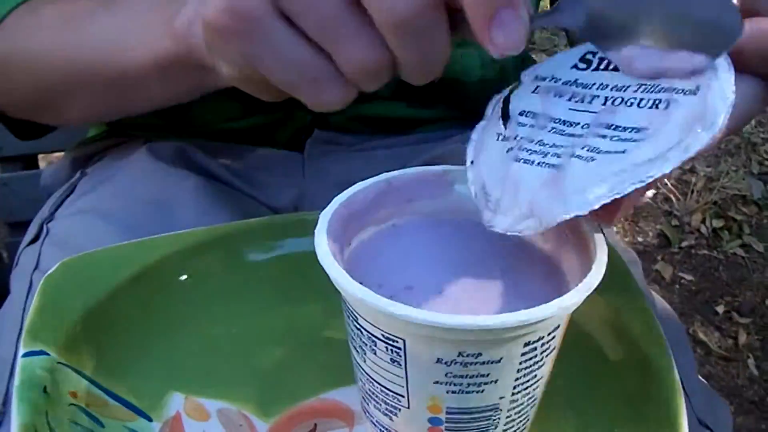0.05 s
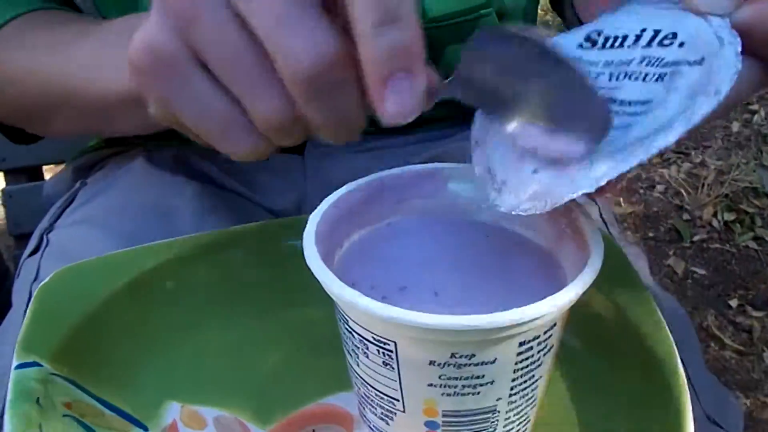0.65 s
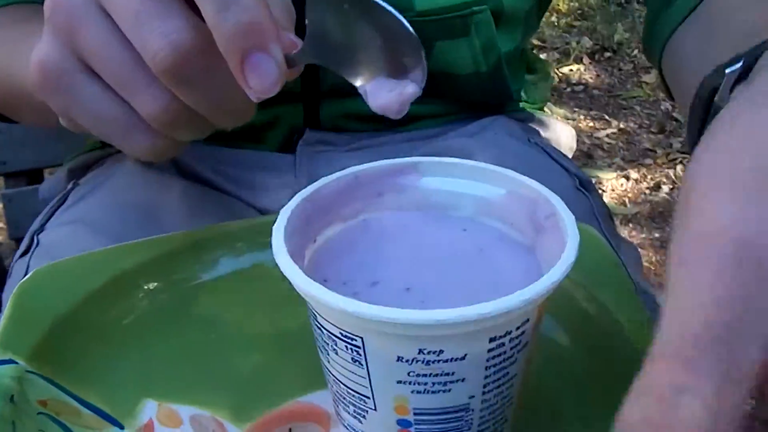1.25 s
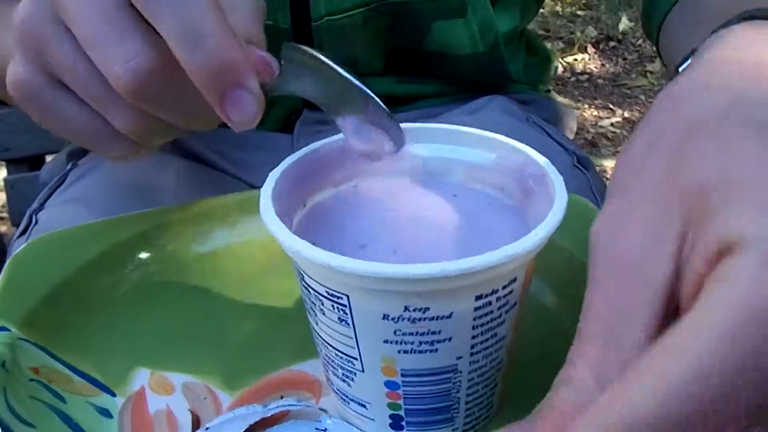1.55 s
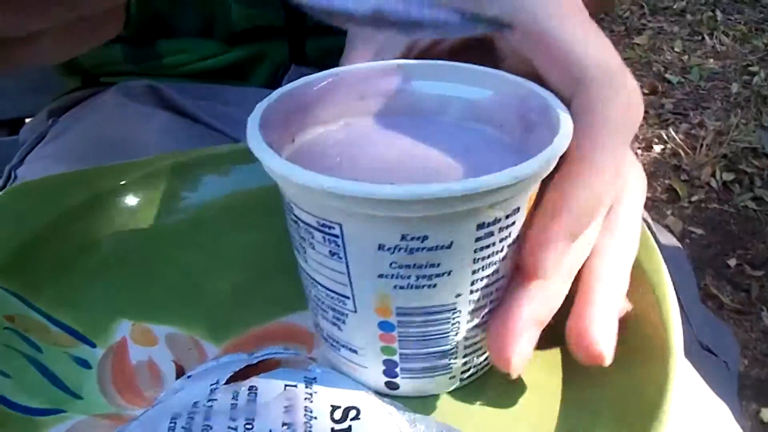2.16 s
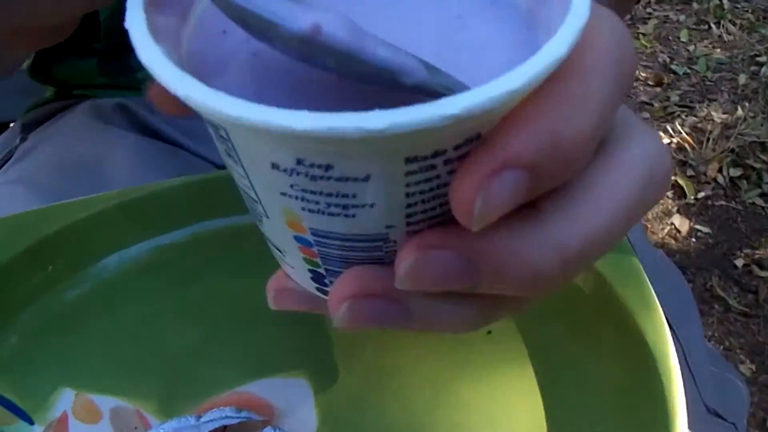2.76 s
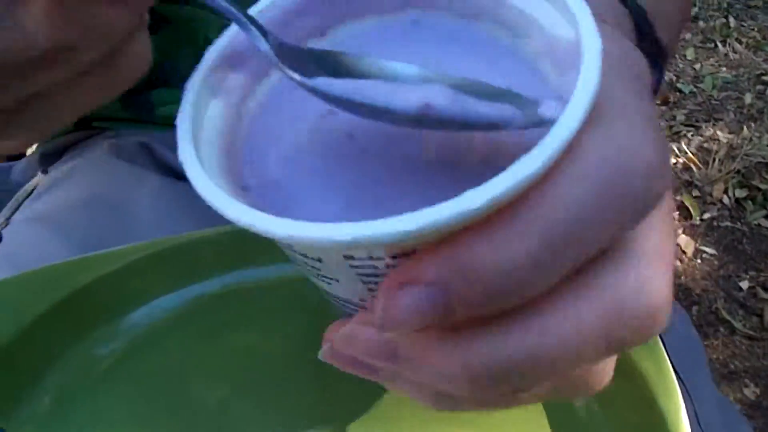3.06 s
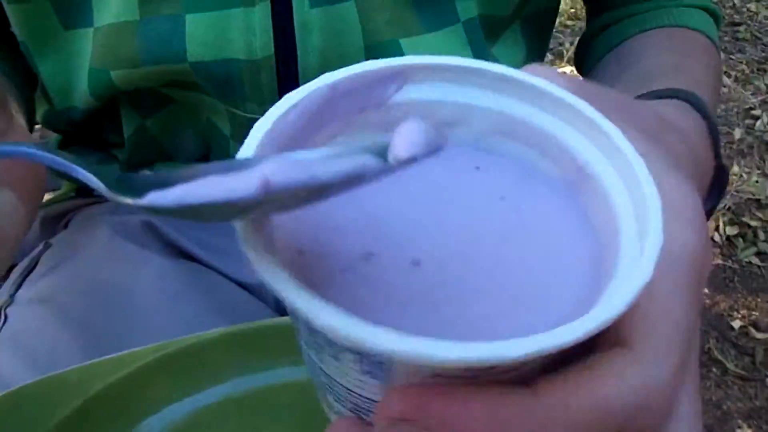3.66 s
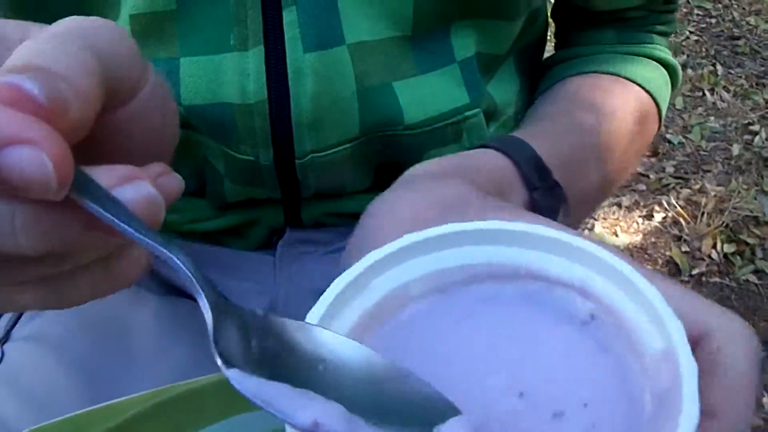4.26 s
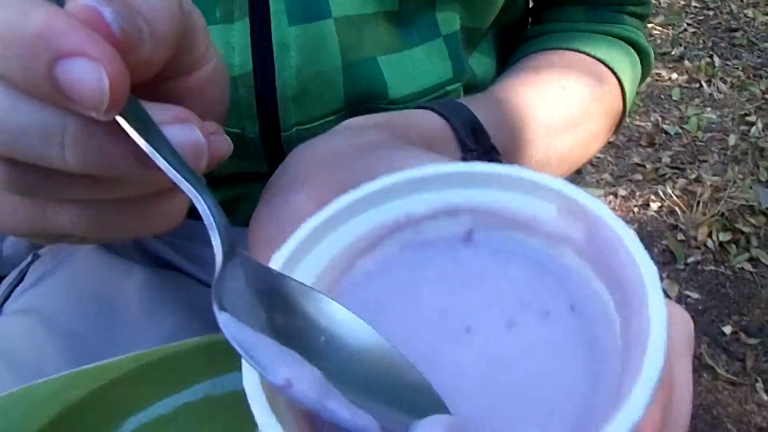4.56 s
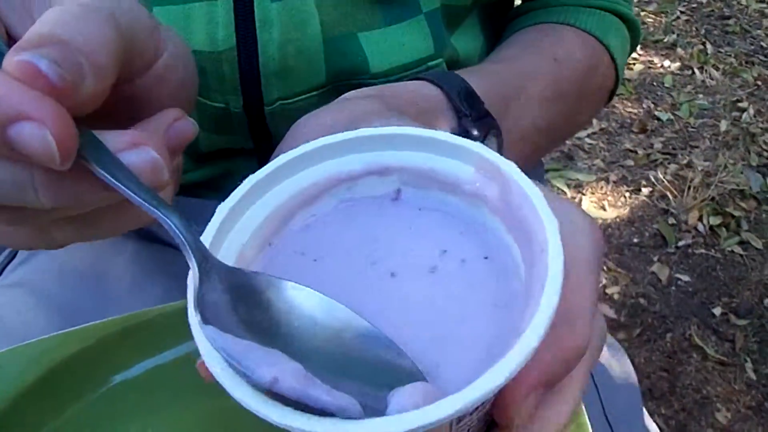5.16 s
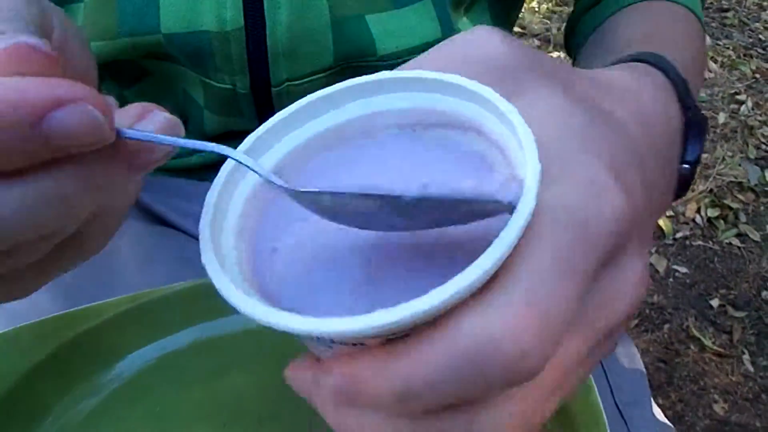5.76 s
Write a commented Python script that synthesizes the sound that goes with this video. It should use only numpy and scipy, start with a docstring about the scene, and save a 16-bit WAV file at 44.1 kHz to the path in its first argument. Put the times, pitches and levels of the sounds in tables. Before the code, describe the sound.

Two close spoon scrapes on foil and a sharp crinkle give way to light plastic cup taps and sleeve swishes over soft outdoor noise.

```python
"""A steel spoon scrapes yogurt off a foil lid in two strokes of stick-slip friction, close by, outdoors.
The lid crinkles as it is put down, its creases buckling one after another. A thin plastic cup gives dry
ticks as it is handled and the spoon taps its rim; fingers slide on its wall and a sleeve swishes.
Behind it all lies outdoor background noise, a soft rush with a low rumble, turned down by the recorder's
automatic gain at the loud crinkle and later swelling gently."""
import sys
import numpy as np
from scipy import signal
from scipy.fft import rfft, irfft, next_fast_len
from scipy.io import wavfile
from scipy.ndimage import map_coordinates

SR = 44100
rng = np.random.default_rng(int(sys.argv[2]) if len(sys.argv) > 2 else 0)


def store_pcm(level_fs):
    """Save levels as 16-bit WAV."""
    pcm = np.round(np.clip(level_fs, -1, 1) * 32767).astype(np.int16)
    wavfile.write(sys.argv[1], SR, np.atleast_2d(pcm).T)


N = 260631
T = np.arange(N) / SR

# Levels in the tables are relative; each source sets its own overall gain.
# outdoor background, with the automatic gain's drop at the crinkle written in: time_s, rush_db, hiss_db
BACKGROUND_LEVELS = [(0, -43, -41.5), (.35, -46.5, -45), (1.2, -47, -45.5), (1.6, -53, -54.5),
                     (3.7, -55, -53), (4.15, -51.5, -52), (4.55, -48.5, -49), (4.85, -51, -52),
                     (5.9, -52, -49)]
# spectra of its three bands: frequency_hz, gain_db
RUMBLE_SPECTRUM = [(12, -8.5), (32, 1), (60, -1), (105, -3), (150, -8.5), (220, -7.5), (350, -21.5),
                   (800, -48)]
RUSH_SPECTRUM = [(120, -8.5), (300, -0.5), (700, -1), (1000, 1), (1400, -3.5), (1900, -5.5), (2200, -3),
                 (2500, -13.5), (5000, -21), (12000, -31)]
HISS_SPECTRUM = [(1000, -13.5), (2600, 3), (4800, 2.5), (6500, 1), (9000, 2), (11500, -1), (14000, -8)]
# rubbing gestures: start_s, length_s, level_db, fastest_at_fraction, brightness_db
SLEEVE_SWISHES = [(2.17, 0.036, -44.5, 0.45, -1), (3.44, 0.15, -41.5, 0.62, 1.5),
                  (3.718, 0.064, -47, 0.54, 5), (3.885, 0.12, -44.5, 0.4, -5), (4.012, 0.15, -43, 0, 1),
                  (4.155, .055, -50, 0.6, 0), (4.32, 0.15, -43.5, 0.22, -1.5), (4.5, 0.15, -44, 0.86, -2)]
FINGER_SLIDES = [(2.235, 0.099, -53, .7, 2), (2.9, 0.06, -46, 0.25, 4), (2.96, 0.03, -42, 0.3, 7),
                 (2.998, .055, -44, .5, 4), (3.04, .3, -44.5, 0.44, 1.5), (5.25, 0.18, -46.5, 0.1, -4),
                 (5.42, 0.089, -40.5, 0.86, -3), (5.51, 0.18, -38.5, 0.4, 0.5), (5.693, 0.077, -37, .55, 4)]
YOGURT_DRAGS = [(0.076, 0.21, -34.5, 0, 7), (0.625, 0.08, -32, 0.88, -4)]
SPOON_STROKES = [(0.095, 0.2, -27.5, 0.4, 0.5), (0.572, 0.143, -26, 0.45, -2)]
# spectra of the rubbed or buckling materials: frequency_hz, gain_db
CLOTH_SPECTRUM = [(1500, -14.5), (3500, -4.5), (6500, -5), (9000, 1), (11000, 0.5), (14000, -6)]
FINGERTIP_SPECTRUM = [(2000, -26), (2900, -18), (3300, -6.5), (4500, -5.5), (5300, -5.5), (6400, 0),
                      (7500, -2), (8400, -6), (9800, -5.5), (11600, -5), (12600, -15), (14000, -18)]
FOIL_SPECTRUM = [(300, -35), (1400, -20.5), (2100, -9.5), (2900, -9.5), (3500, -6.5), (4300, -3.5),
                 (5200, -4.5), (6200, -6.5), (7300, -4.5), (8400, -2), (9600, -2.5), (11000, -3.5),
                 (12500, -8.5), (14000, -12.5)]
YOGURT_SPECTRUM = [(100, 5), (250, -5), (600, 1.5), (1100, 4), (1600, -7), (2400, 6.5), (3600, 3),
                   (6000, -32)]
RASP_SPECTRUM = [(800, -32), (1700, -15), (2400, -13.5), (4000, 0), (5500, -3), (7600, -1), (8600, 1.5),
                 (10500, 0), (12000, -4), (14000, -14)]
# resonances of the cup wall: centre_hz, bandwidth_hz, gain_db
CUP_MODES = [(3830, 770, -1), (4690, 510, -2), (5220, 260, -0.5), (6500, 610, -7), (7210, 580, 0),
             (8500, 700, -3.5), (9630, 660, -1.5), (10400, 550, -5), (12000, 870, -5), (12800, 1200, -24)]
# handling ticks and, at 4.64 and 5.15 s, spoon taps on the rim: start_s, level_db, ring_hz, brightness_db
CUP_TICKS = [(2.6721, -33.5, 5600, 0), (2.7013, -29.5, 4580, 1), (3.4618, -39, 8830, 10),
             (3.8195, -40.5, 10700, 7), (3.9463, -33.5, 3900, -11), (3.9737, -39, 4000, -2),
             (4.639, -20, 4200, -4.5), (5.1465, -28, 4100, -3.5), (5.26, -34.5, 4020, -7),
             (5.2807, -33, 4300, -12), (5.3272, -30.5, 5500, 0)]
# creases of the lid buckling: start_s, level_db, ring_hz, brightness_db
FOIL_SNAPS = [(0.0418, -29.5, 3970, -6), (0.0775, -24.5, 2840, -12), (0.0908, -19.5, 2850, -12),
              (0.2548, -22.5, 10200, -4), (0.526, -30, 9050, -2), (0.536, -31, 4610, -1),
              (0.6795, -23, 8700, 4), (0.6965, -26, 8700, 7), (0.7313, -29, 9160, -4),
              (1.2368, -19, 4070, 4), (1.2388, -17.5, 4250, 4), (1.2435, -23.5, 10500, -7),
              (1.279, -17, 11000, -4), (1.282, -16.5, 8180, 8), (1.2852, -12, 8350, 4),
              (1.2952, -23, 8400, -2), (1.3, -16.5, 8350, 3), (1.3145, -17, 11460, 9),
              (1.3203, -19, 8940, 7), (1.324, -19.5, 2110, -6), (1.3378, -21, 8500, 0),
              (1.345, -15.5, 10720, -1), (1.3488, -19, 8940, -2), (1.3532, -16, 8660, 5),
              (1.3955, -24, 5500, 10), (1.41, -24, 5070, 13), (1.452, -30, 8700, -3),
              (1.462, -27.5, 8400, -3), (1.495, -31, 4570, -5), (1.499, -33, 4400, -7),
              (1.5088, -21, 4700, 4), (1.5135, -21.5, 4500, -3), (1.5378, -20.5, 8200, 2),
              (1.5445, -28, 8100, -5), (1.5535, -25, 6930, -4), (1.5675, -29.5, 8180, 0),
              (1.581, -31.5, 8270, -2), (2.3163, -34.5, 4700, 0), (2.3245, -35, 4700, 7),
              (2.3278, -27.5, 9360, 6), (2.3453, -31, 9400, -3), (2.352, -31, 9300, 3),
              (2.3548, -27.5, 9800, 8), (2.377, -42, 10010, 2)]

PRESS_START_S, PRESS_HOLD_S, PRESS_END_S = 1.308, 0.049, 1.568  # the lid is pressed, held and let go


def amp(db):
    """Amplitude ratio of a level in decibels."""
    return 10 ** (np.asarray(db) / 20)


def unit(x):
    """Normalisation to an rms of 1."""
    return x / np.sqrt(np.mean(x ** 2) + 1e-20)


def wobble(rate_hz):
    """Random modulation: a smooth curve through rate_hz Gaussian values a second."""
    return map_coordinates(rng.standard_normal(int(N * rate_hz / SR) + 4), [T * rate_hz])


def gate(start_s, end_s, edge_s):
    """Trapezoidal envelope of a contact."""
    return np.clip(np.minimum(T - start_s, end_s - T) / edge_s + .5, 0, 1)


def contour(spectrum):
    """Spectral envelope: gain interpolated in decibels over log frequency."""
    corner_hz, db = np.transpose(spectrum)
    return lambda hz: amp(np.interp(np.log(hz), np.log(corner_hz), db))


def tilted(body, brightness_db):
    """Shelving: a smooth step of brightness_db, centred on 6200 Hz, applied to a body's response."""
    return lambda hz: body(hz) * amp(brightness_db * np.tanh(2 * np.log2(hz / 6200)) / 2)


def colour(x, gain):
    """Minimum-phase filtering: folding the cepstrum gives a causal response of magnitude gain(hz)."""
    size = 2 * next_fast_len(len(x) // 2 + 2048)
    cepstrum = irfft(np.log(gain(np.fft.rfftfreq(size, 1 / SR) + 1)))
    cepstrum[1:size // 2] *= 2
    cepstrum[size // 2 + 1:] = 0
    return irfft(rfft(x, size) * np.exp(rfft(cepstrum)), size)[:len(x)]


def flexing(x, depth_db, width_hz, life_s):
    """Time-varying filtering: a bending sheet has moving peaks and notches, each lasting about life_s."""
    hz, t, spectrogram = signal.stft(x, SR, nperseg=128)
    knots = rng.standard_normal((200, 2000))
    grid = np.meshgrid(hz / width_hz, t / life_s, indexing="ij")
    ripple_db = depth_db * map_coordinates(knots, grid, mode="mirror")
    return signal.istft(spectrogram * unit(amp(ripple_db)), SR, nperseg=128)[1][:N]


def friction(body, slips_per_s, spread_db, smooth, size=N):
    """Stick-slip friction: uneven impulses and a share of smooth noise excite a body; rms 1."""
    strengths = amp(spread_db * np.clip(rng.standard_normal(size), -2, 2))
    signs = rng.choice([-1, 1], size)
    slips = unit(strengths * signs * (rng.random(size) < slips_per_s / SR))
    return unit(colour(slips + smooth * rng.standard_normal(size), body))


def rubbing(gestures, body, exponent, **texture):
    """Friction noise grows as a power of sliding speed, which rises and falls once in each gesture."""
    out = np.zeros(N + SR)
    t = np.arange(SR // 2) / SR
    for start_s, length_s, level_db, fastest_at, brightness_db in gestures:
        fastest_s = length_s * np.clip(fastest_at, .05, .95)
        speed = np.sin(np.interp(t, [0, fastest_s, length_s], [0, 1, 0]) * np.pi / 2)
        rub = friction(tilted(body, brightness_db), size=len(t), **texture)
        out[round(start_s * SR):][:len(t)] += amp(level_db) * speed ** exponent * rub
    return out[:N]


def shell_pops(events, body, drive_s, crack_t60_s, tail_db, tail_t60_s, ring_db, ring_t60_s):
    """Transient response of a thin shell: after a jolt of drive_s, dense modes decay and one rings."""
    out = np.zeros(N + SR)
    t = np.arange(SR // 16) / SR
    onset = slice(int(.003 * SR))  # the first 3 ms set each pop's level
    decay = amp(-60 * np.maximum(t - drive_s, 0) / crack_t60_s) + amp(tail_db - 60 * t / tail_t60_s)
    ring_envelope = amp(-60 * t / ring_t60_s) * (1 - np.exp(-t / 0.00031))
    for start_s, level_db, ring_hz, brightness_db in events:
        crack = colour(decay * rng.choice([-1, 1], len(t)), tilted(body, brightness_db))
        ring = np.sin(2 * np.pi * ring_hz * t) * ring_envelope
        ring_gain = amp(ring_db - 0.39 * brightness_db)  # dull pops ring more
        pop = crack / np.std(crack[onset]) + ring_gain * ring / np.std(ring[onset])
        out[round(start_s * SR):][:len(t)] += amp(level_db) * pop / np.std(pop[onset])
    return out[:N]


def outdoor_background():
    """Broadband noise on a set level curve: automatic gain lowers it at the crinkle; later it swells."""
    def noise(spectrum):
        return unit(colour(rng.standard_normal(N), contour(spectrum)))

    time_s, *levels = np.transpose(BACKGROUND_LEVELS)
    rush_db, hiss_db = [np.interp(T, time_s, db) for db in levels]
    calm_hiss_db = -54
    rumble_db = -50 + 0.58 * (hiss_db - calm_hiss_db)  # the rumble follows the hiss
    rumble = amp(rumble_db + .8 * wobble(5.53)) * noise(RUMBLE_SPECTRUM)
    rush = amp(rush_db + 1 + 0.16 * wobble(5.55)) * noise(RUSH_SPECTRUM)
    return rumble + rush + amp(hiss_db) * noise(HISS_SPECTRUM)


def sleeve():
    """Friction of cloth on cloth as the arm lifts the cup; moving folds shift the spectrum."""
    brush = rubbing(SLEEVE_SWISHES, contour(CLOTH_SPECTRUM), exponent=0.81,
                    slips_per_s=2600, spread_db=9, smooth=1.6)
    return flexing(brush, depth_db=2.5, width_hz=620, life_s=0.068)


def cup_wall(hz):
    """Modal response: broad resonances add in power; the small shell barely radiates below the first."""
    power = sum(amp(db) ** 2 / (1 + (2 * (hz - centre) / width) ** 2) for centre, width, db in CUP_MODES)
    return np.sqrt(power / (1 + (3420 / hz) ** 22)) + amp(-38)


def fingertip_slip():
    """Friction noise decays exponentially as a fingertip slips off the cup and slows."""
    start_s, length_s, fade_db_per_s = 5.812, .056, 174
    touch = gate(start_s, start_s + length_s, edge_s=0.0027)
    slowing = amp(-28.5 - fade_db_per_s * np.maximum(T - start_s, 0))
    rub = friction(contour(FINGERTIP_SPECTRUM), slips_per_s=4100, spread_db=0, smooth=1.8)
    return touch * slowing * rub


def cup():
    """A damped plastic shell ticks as it is handled and the spoon taps its rim; sliding fingers hiss."""
    ticks = shell_pops(CUP_TICKS, cup_wall, drive_s=0.00047, crack_t60_s=.0035,
                       tail_db=-12, tail_t60_s=.021, ring_db=-5.5, ring_t60_s=0.0079)
    flutter = amp(1.76 * wobble(60))
    slides = rubbing(FINGER_SLIDES, cup_wall, exponent=0.35, slips_per_s=2500, spread_db=-2.5, smooth=1)
    fingers = flutter * slides + fingertip_slip()
    return amp(-1) * ticks + flexing(fingers, depth_db=2.5, width_hz=270, life_s=.12)


def crackle_db(time_s):
    """Relaxation: the lid's crackle is steady under the press, then its level settles exponentially."""
    pressed_db, settled_db, relax_s = -24.5, -40.5, .055
    released_s = np.maximum(time_s - PRESS_START_S - PRESS_HOLD_S, 0)
    return settled_db + (pressed_db - settled_db) * np.exp(-released_s / relax_s)


def small_creases():
    """Foil buckles at jittered intervals, scattered about the crackle's level; rows as FOIL_SNAPS."""
    count, creases_per_s, brightness_db = 100, 130, 3
    jitter, strength, panel = rng.standard_normal((count, 3)).T
    start_s = PRESS_START_S + (np.arange(count) + .5 + np.tanh(jitter) / 2) / creases_per_s
    level_db = crackle_db(start_s) + 0.5 + 4.5 * strength
    ring_hz = 7660 * 2 ** (.35 * panel)
    return [(s, db, hz, brightness_db) for s, db, hz in zip(start_s, level_db, ring_hz) if s < PRESS_END_S]


def foil_lid():
    """Creases buckle under the spoon, then over fine crackle in the press, then as the cup nudges them."""
    foil = contour(FOIL_SPECTRUM)
    snaps = shell_pops(FOIL_SNAPS + small_creases(), foil, drive_s=0.001, crack_t60_s=.017,
                       tail_db=0, tail_t60_s=.027, ring_db=-5, ring_t60_s=0.014)
    press = gate(PRESS_START_S, PRESS_END_S, edge_s=.006) * amp(crackle_db(T))
    crackle = press * friction(tilted(foil, 1.3), slips_per_s=2500, spread_db=2.5, smooth=0.59)
    return flexing(snaps + crackle, depth_db=3.5, width_hz=320, life_s=.03)


def spoon():
    """Stick-slip friction: the edge chatters over embossed foil and drags the yogurt ahead of it."""
    chatter = amp(1.5 * wobble(130.2))
    rasp = rubbing(SPOON_STROKES, contour(RASP_SPECTRUM), exponent=0.34,
                   slips_per_s=3000, spread_db=3, smooth=0.72)
    drag = rubbing(YOGURT_DRAGS, contour(YOGURT_SPECTRUM), exponent=0.56,
                   slips_per_s=1000, spread_db=5.5, smooth=1)
    return flexing(amp(-2.5) * chatter * (rasp + drag), depth_db=4, width_hz=355, life_s=0.0341)


def scene():
    """Superposition in a free field: the sources add at one point, without reflections."""
    return (spoon() + foil_lid() + cup() + sleeve() + outdoor_background())[None]


def record(dry):
    """Band limiting: a steep low-pass filter removes the highest treble."""
    cutoff_hz, transition_hz = 14150, 400
    size = next_fast_len(N + SR // 2)
    hz = np.fft.rfftfreq(size, 1 / SR)
    passband = np.clip((cutoff_hz - hz) / transition_hz + .5, 0, 1)
    return irfft(rfft(dry, size) * passband, size)[:, :N]


dry = scene()
out = record(dry)
store_pcm(out)
```